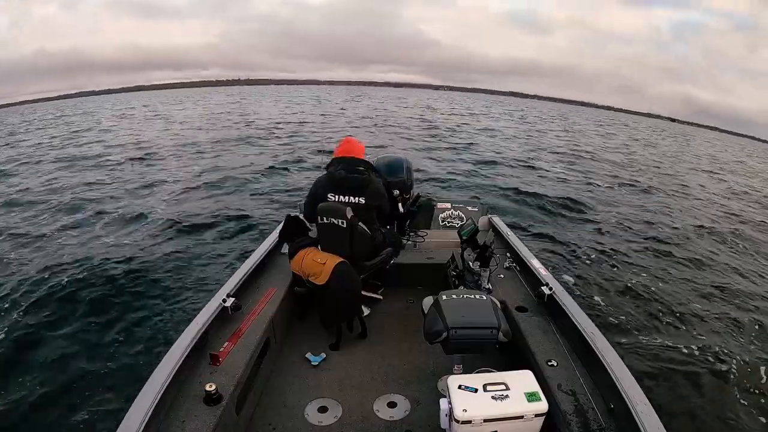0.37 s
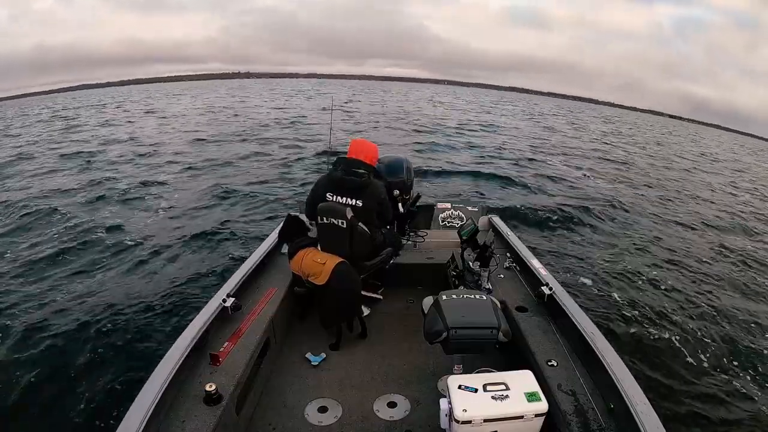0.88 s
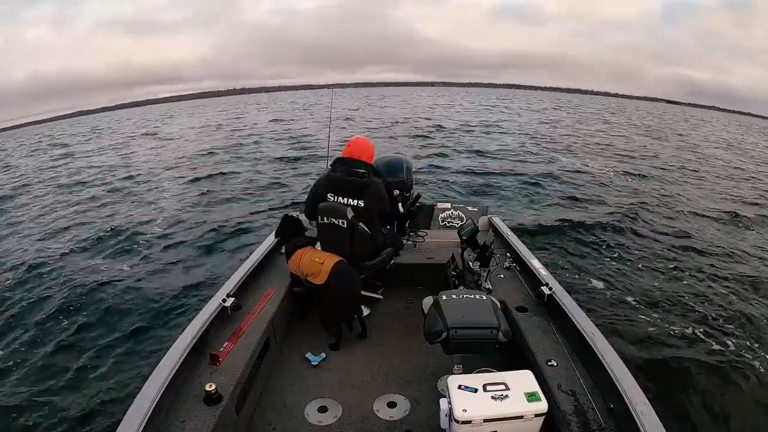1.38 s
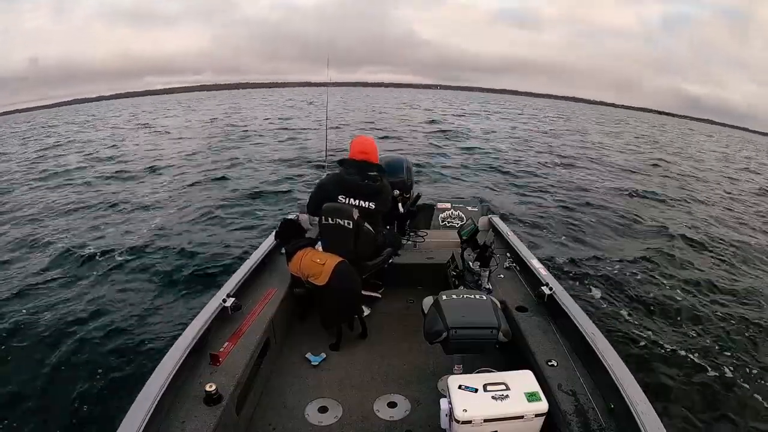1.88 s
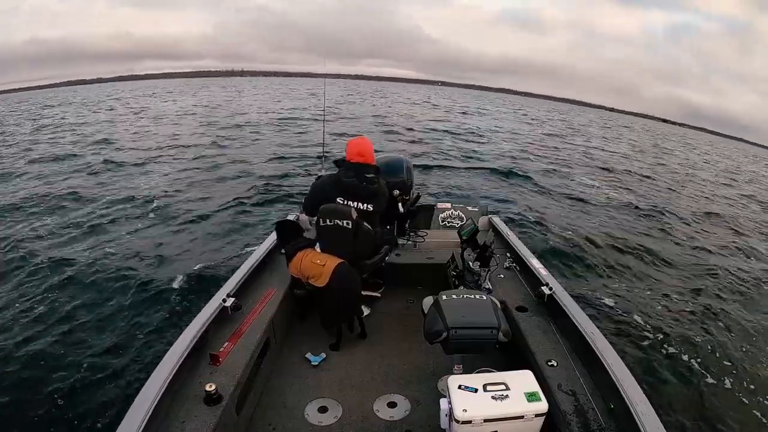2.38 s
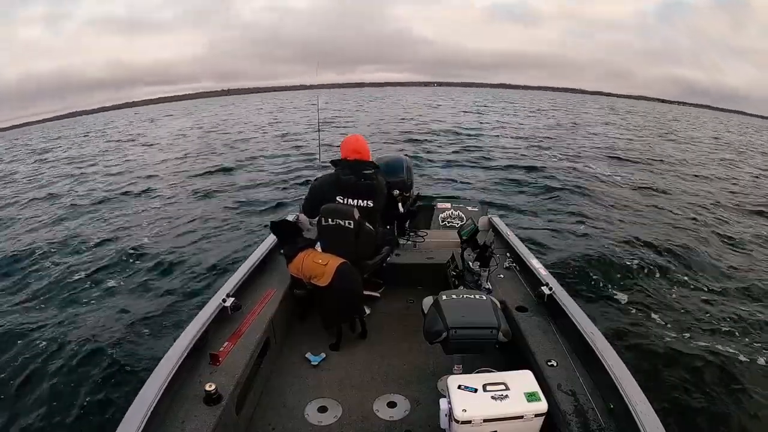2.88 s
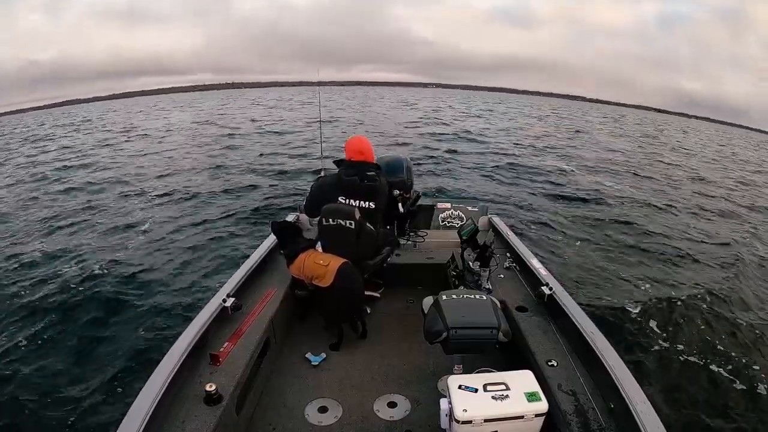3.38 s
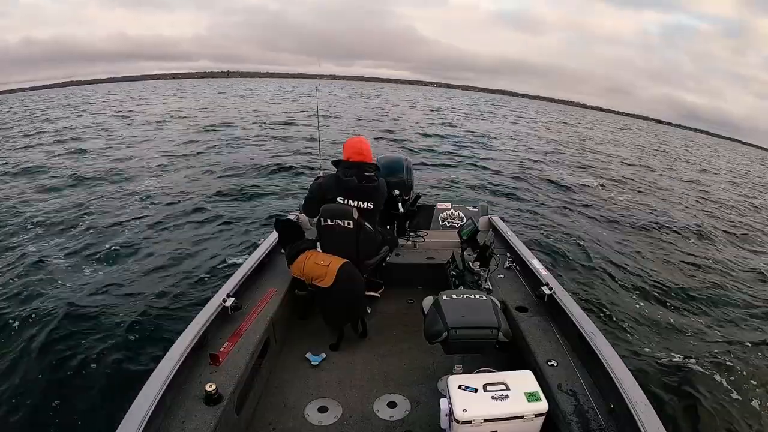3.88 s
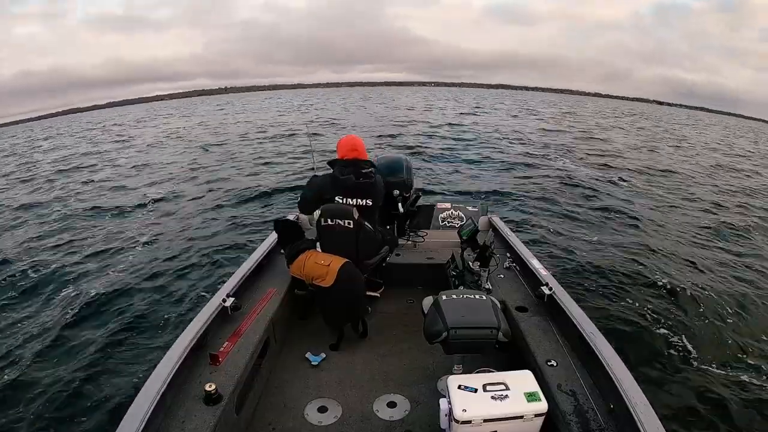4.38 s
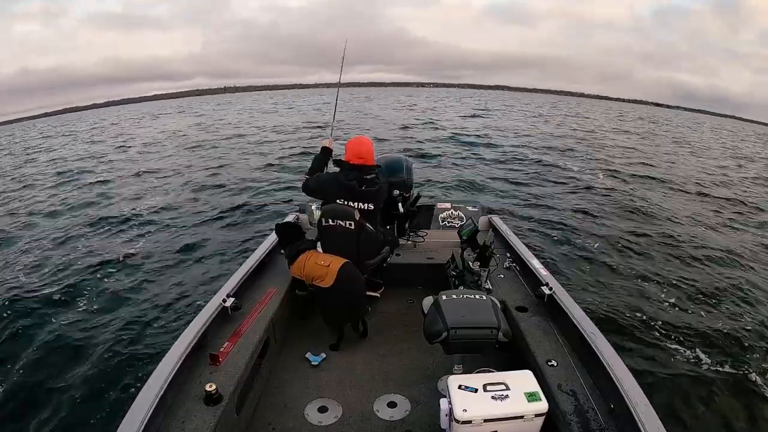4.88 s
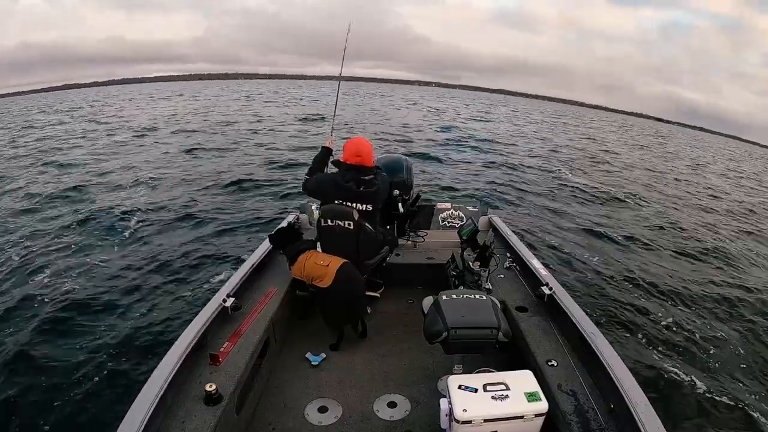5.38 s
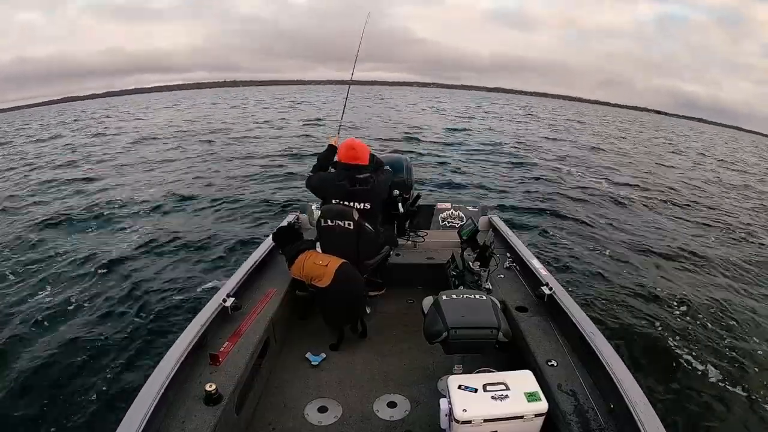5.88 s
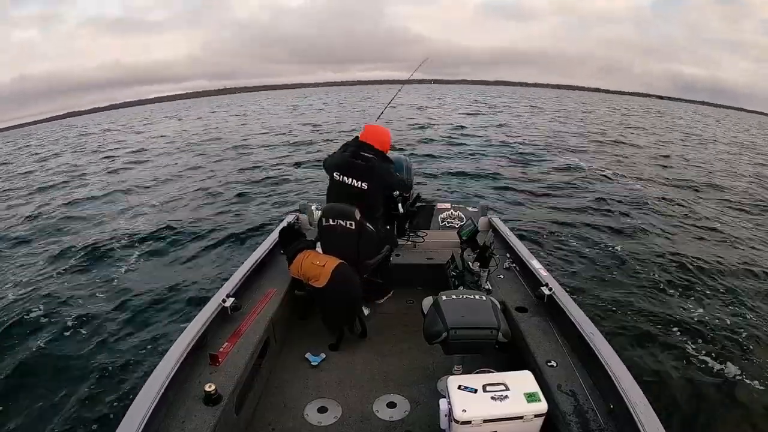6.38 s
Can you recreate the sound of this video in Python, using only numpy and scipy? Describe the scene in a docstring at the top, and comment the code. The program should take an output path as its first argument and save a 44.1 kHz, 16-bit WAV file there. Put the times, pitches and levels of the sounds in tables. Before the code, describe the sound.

Choppy water slops and gurgles against a small boat; a dense clatter of hard knocks opens, and later a fishing reel ticks amid scattered knocks.

```python
"""Choppy water slops and gurgles on a small open boat: noise bands and ringing bubbles follow level curves.
Loose gear knocks in a dense hard run in the first half second: short contacts set damped hull modes ringing.
Flung water then splats in three flurries, and loud single bubbles, swelling sines that climb, plop throughout.
At 4.6 s a fishing reel spins, then ticks on: noise snaps and metal modes. At 6.1 s an edge slides along the rail
as band noise amid hard knocks; a deep bubble ends it. Far lake and side noise lie under all, nearly mono."""
import sys
import numpy as np
from scipy import signal
from scipy.fft import rfft, irfft
from scipy.io import wavfile

SR = 44100
rng = np.random.default_rng(int(sys.argv[2]) if len(sys.argv) > 2 else 0)


def amplitude_ratio(level_db):
    """Convert a level in decibels to the matching linear amplitude (field) ratio."""
    exponent = np.asarray(level_db, float) / 20
    return 10 ** exponent


def unload_audio(sound):
    """Save the sound as a 16-bit wav file, at the path given as the first command line argument."""
    columns = np.transpose(np.atleast_2d(sound))
    # keep every value between -1 and 1, then stretch to whole-number steps
    steps = np.round(np.clip(columns, -1, 1) * 32767)
    wavfile.write(sys.argv[1], SR, steps.astype(np.int16))


N = 286645  # samples, 6.5 s


def rms_one(x):
    """Normalization: scale to unit root-mean-square."""
    return x / np.sqrt(np.mean(x ** 2) + 1e-20)


def at_hz(points, hz):
    """Logarithmic frequency: interpolate a spectrum in dB on a log-frequency axis."""
    frequencies, levels_db = np.transpose(points)
    return np.interp(np.log(hz), np.log(frequencies), levels_db)


def levels(rows):
    """Envelope control: interpolate each dB column of (start_s, level_db, ..) over time."""
    s, *columns = np.transpose(rows)
    return [np.interp(np.arange(N) / SR, s, db) for db in columns]


def drift(rate_hz):
    """Low-passed random fluctuation: two equal poles leave slow chance of unit rms."""
    hop = 40  # samples between computed points
    pole = np.exp(-2 * np.pi * rate_hz * hop / SR)
    chance = rng.standard_normal(N // hop + 2002)
    slow = signal.lfilter([1], [1, -2 * pole, pole * pole], chance)[2000:]  # drop the filter's run-in
    return np.interp(np.arange(N) / hop, np.arange(len(slow)), rms_one(slow))


def ring(clicks, hz, t60_s):
    """Damped resonance: a two-pole mode turns a unit click into a dying sine of height 1."""
    r, w = amplitude_ratio(-60 / (t60_s * SR)), 2 * np.pi * hz / SR
    return signal.lfilter([0, np.sin(w)], [1, -2 * r * np.cos(w), r * r], clicks + 1e-18)


def add(out, s, sound):
    """Superposition: mix a short sound in at s seconds."""
    i = round(s * SR)
    out[i:i + len(sound)] += sound[:N - i]


def coloured(spectrum, size):
    """Spectral shaping: steady noise weighted in frequency; unit rms."""
    hz = np.linspace(1, SR / 2, size // 2 + 1)
    return rms_one(irfft(rfft(rng.standard_normal(size)) * amplitude_ratio(at_hz(spectrum, hz)), size))


def burst(spectrum, t60_s, attack_s=0.00028):
    """Exponential decay: unit-rms noise with a short linear onset dies fast."""
    t = np.arange(2048) / SR
    return coloured(spectrum, size=2048) * amplitude_ratio(-60 * t / t60_s) * np.minimum(t / attack_s, 1)


def patchy_noise(spectrum, shared_db, own_db, rate_hz):
    """Amplitude modulation: half-octave noise bands swell together and flicker alone; unit rms."""
    out, together = 0, drift(rate_hz)
    octaves = np.log2(spectrum[-1][0] / spectrum[0][0])
    edges = spectrum[0][0] * 2 ** np.arange(0, octaves + .1, .5)
    white = rng.standard_normal((2, N))
    for k, low in enumerate(edges):
        high = min(low * np.sqrt(2), SR / 2.2)
        band = signal.sosfilt(signal.butter(2, [low, high], "band", fs=SR, output="sos"), white[k % 2])
        band_db = at_hz(spectrum, np.sqrt(low * high)) + shared_db * together + own_db * drift(rate_hz)
        out = out + band * amplitude_ratio(band_db)
    return rms_one(out)


def bubbles(spectrum, per_s, cycles, spread_db):
    """Bubble resonance: clumped random births each swell softly and ring some cycles; unit rms."""
    sizes = amplitude_ratio(spread_db * np.minimum(rng.exponential(1, N), 4)) * rng.choice([-1, 1], N)
    born = rng.random(N) < per_s * amplitude_ratio(5 * drift(9)) / SR
    pitches = np.geomspace(spectrum[0][0], spectrum[-1][0], 18)
    dealt = rng.integers(0, 18, N)
    out = 0
    for k, hz in enumerate(pitches):
        once = ring(sizes * born * (dealt == k), hz, cycles / hz)
        twice = ring(once, hz, cycles / hz)  # the second pass makes the soft swell
        out = out + rms_one(twice) * amplitude_ratio(at_hz(spectrum, hz)) * np.sqrt(hz)
    return rms_one(out)


# waves under the hull: start_s, rumble_level_db, gurgle_level_db
WAVES = [(0, -35.5, -47.5), (.31, -56, -58.5), (.5, -42.5, -47), (.9, -48.5, -48), (1.3, -50, -49.5),
         (1.5, -46, -50), (1.85, -52, -44.5), (2.06, -49, -42), (2.16, -42, -35), (2.37, -43.5, -41.5),
         (2.55, -48, -38.5), (2.75, -50.5, -47), (3.04, -35.5, -46), (3.42, -50, -47.5), (3.5, -48, -36),
         (3.7, -44.5, -42.5), (3.77, -47.5, -57), (4.4, -50, -48), (4.6, -46, -51), (5.02, -45.5, -50.5),
         (5.09, -45, -41), (5.17, -47, -53.5), (5.5, -43.5, -47.5), (5.65, -43, -44.5), (6.08, -45, -48.5),
         (6.3, -40.5, -47.5), (6.5, -36, -40.5)]
# relative spectra of wave push and gurgle: frequency_hz, density_db_per_hz
RUMBLE_SPECTRUM = [(20, 10.5), (40, -1), (90, 4), (140, 0), (250, -30)]
GURGLE_SPECTRUM = [(90, -22), (160, -5), (320, -2.5), (500, -9), (900, -21.5)]


def waves():
    """Wave push and bubble resonance: low rumble beneath slopping noise and big bubbles."""
    rumble, gurgle = amplitude_ratio(np.array(levels(WAVES)))
    push = patchy_noise(RUMBLE_SPECTRUM, shared_db=1.0, own_db=-1.0, rate_hz=3.8)
    slop = amplitude_ratio(-4.0) * patchy_noise(GURGLE_SPECTRUM, shared_db=-1.5, own_db=5.5, rate_hz=11.5)
    big = amplitude_ratio(2.5) * bubbles(GURGLE_SPECTRUM, per_s=250, cycles=13, spread_db=3.5)
    return rumble * push + gurgle * (slop + big)


# crests breaking on the side: crest_s, lift_db, build_up_s, dying_s
BREAKING_CRESTS = [(.17, 0.5, 0.032, 0.025), (.47, 11.5, 0.12, 0.23), (.9, 6, 0.12, 0.087),
                   (1.46, 9.5, 0.19, 0.19), (2.46, 5.5, 0.092, 0.15), (3.15, 3.5, 0.037, 0.055),
                   (3.7, 7, 0.039, 0.045), (4.56, 18.5, 0.16, 0.085), (5.07, 8, 0.053, 0.07),
                   (5.58, 7, 0.051, 0.086), (5.76, 2, 0.052, .06)]


def crests():
    """Piecewise-linear envelope: lift in dB climbs straight to each crest and falls straight after it."""
    t = np.arange(N) / SR
    return sum(np.interp(t, [s - rise, s, s + fall], [0, db, 0]) for s, db, rise, fall in BREAKING_CRESTS)


def patter(per_s=90, low_hz=1000, high_hz=4470):
    """Random impulses: single drops tick on the hull through a band-pass; unit rms."""
    sizes = amplitude_ratio(4.7 * np.minimum(rng.exponential(1, N), 3)) * rng.choice([-1, 1], N)
    drops = sizes * (rng.random(N) < per_s / SR) + 1e-18
    return rms_one(signal.sosfilt(signal.butter(2, [low_hz, high_hz], "band", fs=SR, output="sos"), drops))


# water breaking on the side, before crest lift: start_s, wash_level_db, fizz_level_db, spray_level_db
BREAKING_WATER = [(0.0, -45, -46, -47), (0.4, -47, -51, -52), (1.14, -50.5, -56.5, -61),
                  (1.3, -50.5, -55, -55.5), (1.54, -43, -48.5, -46.5), (1.9, -44, -55, -54.5),
                  (2.12, -45, -55, -54.5), (2.5, -41.5, -48.5, -49.5), (2.82, -48, -57.5, -55.5),
                  (3.35, -49, -57.5, -56), (3.56, -48, -59, -59), (4.0, -52, -59, -62),
                  (4.33, -52, -64, -60.5), (4.65, -46.5, -58, -52.5), (4.83, -51, -62, -61.5),
                  (5.32, -53, -66, -61.5), (5.49, -47.5, -61, -58.5), (5.72, -42.5, -47.5, -43.5),
                  (5.97, -43.5, -44.5, -50), (6.5, -42, -46.5, -43)]
# relative spectra, from larger to finer bubbles and drops: frequency_hz, density_db_per_hz
WASH_SPECTRUM = [(350, 1), (600, 6), (1000, 1.5), (1600, -1), (2200, -28.5)]
FIZZ_SPECTRUM = [(1400, -4.5), (2000, 4.5), (2800, 3.5), (4000, -5.5), (5600, -25)]
SPRAY_SPECTRUM = [(2800, -4), (4000, 2.5), (6000, 2.5), (10000, -0.5), (13000, -0.5), (16000, -62)]


def splash():
    """Bubble size and pitch: smaller, shorter bubbles ring higher amid noise; crests lift all three bands."""
    wash_db, fizz_db, spray_db = levels(BREAKING_WATER)
    lift_db = crests()
    # each band takes its share of a crest's lift
    wash, fizz, spray = amplitude_ratio(wash_db + 0.76 * lift_db), amplitude_ratio(fizz_db + 0.91 * lift_db), amplitude_ratio(spray_db + 0.73 * lift_db)
    wash_noise = amplitude_ratio(-0.5) * patchy_noise(WASH_SPECTRUM, shared_db=3.5, own_db=3.5, rate_hz=35.4)
    small = amplitude_ratio(-3) * bubbles(WASH_SPECTRUM, per_s=700, cycles=42.0, spread_db=3.0)
    fizz_noise = amplitude_ratio(-1.5) * patchy_noise(FIZZ_SPECTRUM, shared_db=4.0, own_db=2.1, rate_hz=39)
    crowd = np.clip(fizz / amplitude_ratio(-56), 1, 8)  # a stronger splash holds more bubbles
    tiny = amplitude_ratio(-5) * bubbles(FIZZ_SPECTRUM, per_s=200 * crowd, cycles=35, spread_db=4.5) / np.sqrt(crowd)
    drops = amplitude_ratio(-7) * patter()
    spray_noise = patchy_noise(SPRAY_SPECTRUM, shared_db=4.0, own_db=-0.4, rate_hz=15)
    droplets = amplitude_ratio(-8) * bubbles(SPRAY_SPECTRUM, per_s=500, cycles=30, spread_db=5)
    return wash * (wash_noise + small) + fizz * (fizz_noise + tiny + drops) + spray * (spray_noise + droplets)


# single loud bubbles: start_s, peak_level_db (before wobble), start_pitch_hz, pitch_climb (share, by the peak)
LOUD_BUBBLES = [(.16, -37, 620, .04), (.583, -28, 623, .04), (0.686, -36.5, 140, 0.039),
                (.875, -38, 1900, .15), (.94, -34.5, 341, 0.036), (1.874, -32, 2230, .04),
                (1.955, -39, 800, .04), (1.965, -31, 302, 0.038), (2.006, -30, 356, .04),
                (2.085, -26, 315, 0.042), (2.147, -28.5, 348, .04), (2.224, -32.5, 390, 0.038),
                (2.48, -29.5, 330, 0.036), (2.535, -26, 315, 0.042), (2.675, -35, 563, 0.044),
                (2.692, -33, 480, .04), (2.945, -34, 1250, .04), (2.948, -33.5, 756, 0.038),
                (3.107, -40, 925, .04), (3.335, -34.5, 316, .04), (3.92, -39, 299, .04),
                (3.998, -38, 556, 0.26), (4.107, -34.5, 305, 0.037), (4.753, -36, 544, 0.038),
                (5.065, -31, 337, 0.042), (5.235, -42, 600, .2), (5.473, -34.5, 450, .04),
                (5.926, -33, 1340, .04), (6.024, -29.5, 1680, 0.088), (6.092, -34, 1580, .04),
                (6.484, -14.5, 155, .04)]


def plops(cycles=7, wobble_db=3):
    """Bubble resonance near a surface: a swelling sine climbs in pitch, uneven in the churning water."""
    out = np.zeros(N)
    for s, db, hz, rise in LOUD_BUBBLES:
        age = np.arange(int(4 * cycles / hz * SR)) / SR * hz / cycles
        phase = 2 * np.pi * cycles * (age + rise * age ** 2)
        swell = 2 * np.e * age * np.exp(-2 * age)
        add(out, s, amplitude_ratio(db) * swell * np.sin(phase))
    return out * amplitude_ratio(wobble_db * drift(60))


# hull modes: frequency_hz, relative_level_db (varied at each blow), t60_s
HULL_MODES = [(89, -4.5, 0.018), (166, -7, 0.012), (330, -16.5, 0.033), (743, 3, 0.0074)]
# relative spectrum of the crack: frequency_hz, density_db_per_hz
CRACK_SPECTRUM = [(1500, 3), (3000, 5.5), (6000, 4.5), (9000, -1), (13000, -3), (16500, -35)]


def knocks(rows, crack_t60_s, contact_s):
    """Impact excitation: contact with an inverted deck echo, noisy crack, soft push into damped hull modes."""
    echo_s, echo_db, soft_hz, free_hz = 0.00149, -10, 700, 70
    out, t = np.zeros(N), np.arange(3000) / SR
    push = np.pi * soft_hz / SR * np.sin(np.pi * np.minimum(t * soft_hz, 1))  # one half-sine
    floating = signal.butter(2, free_hz, "high", fs=SR, output="sos")
    age = t / contact_s
    swell = 2 * np.e * age * np.exp(-2 * age)
    for s, db, hz, thump_db, crack_db in rows:
        contact = -swell * np.sin(2 * np.pi * hz * t)
        add(out, s, amplitude_ratio(db) * contact)
        add(out, s + echo_s, -amplitude_ratio(db + echo_db) * contact)
        add(out, s, amplitude_ratio(db + crack_db) * burst(CRACK_SPECTRUM, crack_t60_s))
        modes = sum(amplitude_ratio(mode_db + rng.normal(0, 2.0)) * ring(push, mode_hz, t60_s)
                    for mode_hz, mode_db, t60_s in HULL_MODES)
        thump = signal.sosfilt(floating, modes)  # a floating hull holds no steady load
        add(out, s, amplitude_ratio(db + thump_db) * thump)
    return out


# knocks of gear: start_s, contact_level_db, pitch_hz, thump_db and crack_db (both re contact)
GEAR_KNOCKS = [(.072, -17.5, 2110, -3, -22), (.0752, -7, 2120, -10, -8.5), (.1459, -33, 860, -12, 6),
               (.2958, -23, 1780, -11, -26), (.3002, -17.5, 1770, -12, -26),
               (.3121, -15.5, 1710, -6.5, -16), (.3327, -25, 2130, -12, 3), (.4104, -18.5, 1940, -11, -3),
               (.4149, -27, 814, -6, -1), (.4198, -14.5, 810, -2.5, -25), (.445, -14, 860, -3, -8),
               (.4491, -1, 2030, -8.5, -12.5), (.4568, -21, 1500, 4, -10), (.4602, -3, 1900, -15, -11),
               (.465, -18, 1820, 1, -9), (.4705, -9, 2200, -4, -13), (.4809, -5, 2110, -8, -25),
               (.4909, -7, 766, -9, -8.5), (.4945, -15.5, 840, 1.5, -2.5), (.4988, -10.5, 815, -5, -21),
               (.5279, -10, 2060, -34, -11.5), (.5317, -4, 1320, -20, -37), (.8354, -32, 820, -9, -9),
               (.8889, -22.5, 2360, -32, -13), (.9372, -34, 820, 1, -8), (1.1584, -36, 3300, -18, -8),
               (1.4178, -16, 850, -12, -19), (1.4633, -10.5, 860, -7.5, -10), (1.5084, -37, 2840, -24, 12),
               (1.5176, -17, 1890, -18, -28), (1.5222, -9, 756, -6, 12), (1.5382, -26, 4140, -12, -2),
               (1.5718, -22.5, 1490, -8, -8), (2.2793, -16, 1250, -12, -25), (2.284, -19, 1400, -18, -29),
               (3.014, -25.5, 1360, -11, -20), (3.7299, -24, 1270, -11.5, -16.5),
               (3.8162, -27, 1160, -17, -9), (4.2379, -35, 2220, -4, 0), (4.5116, -29, 3180, -1, -14),
               (4.5306, -23, 930, -7, -7), (4.545, -20, 1040, -20, -17), (4.572, -19, 814, -9, -8),
               (4.643, -25.5, 1550, -22, 1.5), (4.7552, -30, 2430, -23, -20), (4.801, -35.5, 2410, -2, -1),
               (4.9923, -26.5, 1220, -4, -13), (5.3168, -11.5, 1520, -13.5, -8),
               (5.5734, -16.5, 1260, -1.5, -5), (5.656, -21.5, 900, -9, -14), (5.8153, -11, 840, -3.5, -12),
               (5.869, -41.5, 900, 22, -14), (6.0489, -22.5, 810, -9, -21), (6.1419, .5, 2120, -19, -10.5),
               (6.1565, -15, 2690, -10, -6), (6.162, -1, 2070, -21, -9), (6.1775, -7.5, 2550, -28, -9.5),
               (6.2975, -18, 900, -10, -13), (6.486, -27.5, 900, 6, -10)]
# flung water splatting on the hull: start_s, contact_level_db, pitch_hz, crack_db (re contact)
WATER_SPLATS = [(0.8532, -35, 3160, -4.5), (0.9324, -34.5, 3820, 3.5), (1.0, -46, 2300, 0),
                (1.019, -37, 4700, -4), (1.04, -48, 4600, 1), (1.0975, -29.5, 2460, -10),
                (1.1637, -49.5, 1170, 9), (1.24, -60, 3000, 2), (2.39, -24, 1440, -11.5),
                (2.45, -37, 1010, 3), (2.469, -30, 3300, -2), (2.488, -23, 1090, -25),
                (2.503, -32, 2200, -1.5), (2.532, -27.5, 1300, -13), (3.625, -58.5, 3040, 11),
                (3.667, -54.5, 3040, 13), (3.689, -46, 3430, 3.5), (3.7249, -33, 1170, -4.5),
                (3.8132, -37, 5500, -4.5)]


def blows():
    """Contact duration: gear knocks are brief and dry; wet splats are drawn out and ring longer."""
    splats = [(s, db, hz, -6.5, crack_db) for s, db, hz, crack_db in WATER_SPLATS]  # thump 6.5 dB below contact
    gear = knocks(GEAR_KNOCKS, crack_t60_s=0.0071, contact_s=0.00046)
    return gear + knocks(splats, crack_t60_s=0.046, contact_s=0.0016)


# a hard edge slides along the rail: start_s, pitch_hz, level_db
RAIL_SLIDE = [(6.069, 1707, -52), (6.1, 2100, -42), (6.125, 2900, -32), (6.142, 3270, -35),
              (6.175, 3120, -42), (6.185, 3200, -70)]


def slide(width_hz=500):
    """Friction noise: low-passed noise on a carrier forms a band whose centre follows the pitch curve."""
    s, hz, db = np.transpose(RAIL_SLIDE)
    t = np.arange(N) / SR
    lowpass = signal.butter(2, width_hz, fs=SR, output="sos")
    rough = signal.sosfilt(lowpass, rng.standard_normal((2, N)))
    phase = 2 * np.pi * np.cumsum(np.interp(t, s, hz)) / SR
    band = rms_one(rough[0] * np.sin(phase) + rough[1] * np.cos(phase))
    return amplitude_ratio(np.interp(t, s, db, left=-200, right=-200)) * band


# reel ticks: start_s, snap_level_db, ring_db (spool, re snap)
REEL_TICKS = [(4.6462, -26, -25), (4.673, -27.5, -33), (4.7262, -26.5, -36), (4.759, -39, -40),
              (4.799, -40, -36), (4.891, -27, -30), (5.119, -28.5, -30), (5.3022, -24.5, -43),
              (5.4059, -26.5, -29), (5.5121, -26, -36), (5.596, -27, -36), (5.6564, -25.5, -33),
              (5.6868, -26.5, -40), (5.7334, -27.5, -36), (5.7693, -30, -36), (5.7915, -29, -35),
              (5.824, -26.5, -38), (5.8932, -28, -40), (6.01, -27, -38), (6.2358, -26.5, -36),
              (6.307, -24.5, -38), (6.4113, -23.5, -32), (6.452, -23.5, -28)]
# metal spool modes: frequency_hz, relative_level_db (varied at each tick), t60_s
SPOOL_MODES = [(5246, 3, .12), (7630, 4, .29), (9300, 6, .03), (10900, 6, .03), (11840, 3, .11)]
# relative spectrum of the pawl's snap: frequency_hz, density_db_per_hz
SNAP_SPECTRUM = [(3000, -10), (6500, 0.5), (9000, 5), (13000, 4), (15000, -3), (16500, -29)]


def reel(snap_t60_s=.013):
    """Impulse response: a sprung pawl drops with a bright snap, then the metal spool rings thinly."""
    out, click = np.zeros(N), np.arange(12000) == 0
    # a free spin first: seven ticks 10.3 ms apart, each 1.6 dB louder, ring 35 dB below snap
    spin = [(4.568 + k * .0103, -30.5 + k * 1.6, -35) for k in range(7)]
    for s, db, ring_db in spin + REEL_TICKS:
        add(out, s, amplitude_ratio(db) * burst(SNAP_SPECTRUM, snap_t60_s))
        modes = sum(amplitude_ratio(mode_db + rng.normal(0, 3)) * ring(click, hz, t60_s) for hz, mode_db, t60_s in SPOOL_MODES)
        add(out, s, amplitude_ratio(db + ring_db) * modes)
    return out


# relative spectrum of the far lake: frequency_hz, density_db_per_hz
FAR_LAKE_SPECTRUM = [(700, -10), (2000, -8), (5000, -3), (11000, 0), (15500, -2)]


def far_lake(level_db=-67):
    """Stationary noise: the far lake is a steady, faint, coloured hiss."""
    return amplitude_ratio(level_db) * coloured(FAR_LAKE_SPECTRUM, size=N)


# relative spectrum of the side noise: frequency_hz, density_db_per_hz
SIDE_NOISE_SPECTRUM = [(30, 7), (300, 0.5), (1500, -5), (4000, -1.5), (12000, -1.5), (16500, -4)]


def side_signal(mid):
    """Mid-side stereo: a hair of travel time, a faint random share of the middle, and faint patchy noise."""
    travel = amplitude_ratio(-24) * np.gradient(mid)  # the slope stands for a small time shift
    share = amplitude_ratio(-39.5) * drift(15) * mid  # a faint share of the middle, varying at random, goes to the side
    # faint patchy noise, opposite in left and right
    noise = amplitude_ratio(-68.5) * patchy_noise(SIDE_NOISE_SPECTRUM, shared_db=4.0, own_db=3, rate_hz=7.5)
    return travel + share + noise


def scene():
    """Superposition: all sources sum to one middle signal, which two close ports hear nearly alike."""
    mid = waves() + splash() + plops() + blows() + slide() + reel() + far_lake()
    side = side_signal(mid)
    return np.array([mid + side, mid - side])


def top_cut(x):
    """Nothing passes above the cut-off."""
    return signal.sosfilt(signal.butter(12, 16810, fs=SR, output="sos"), x)


def record(dry):
    """Band limit and saturation: treble rolls off above 15.7 kHz and peaks beyond full scale clip."""
    dull = signal.sosfilt(signal.butter(4, 15700, fs=SR, output="sos"), dry)
    mix = np.clip(dull, -1, 1)
    return top_cut(mix)


dry = scene()
out = record(dry)
unload_audio(out)
```